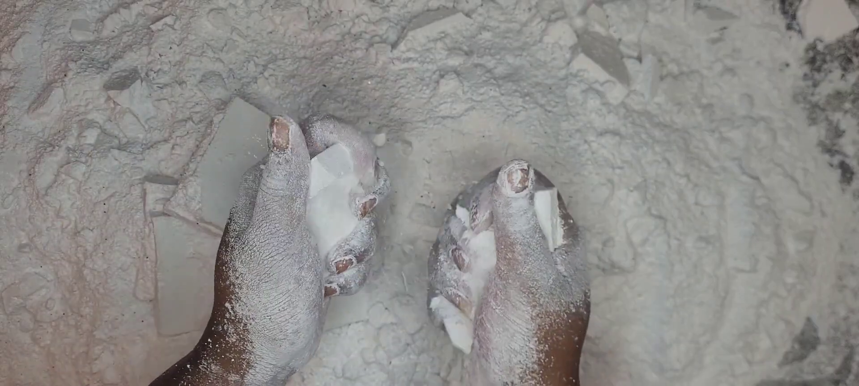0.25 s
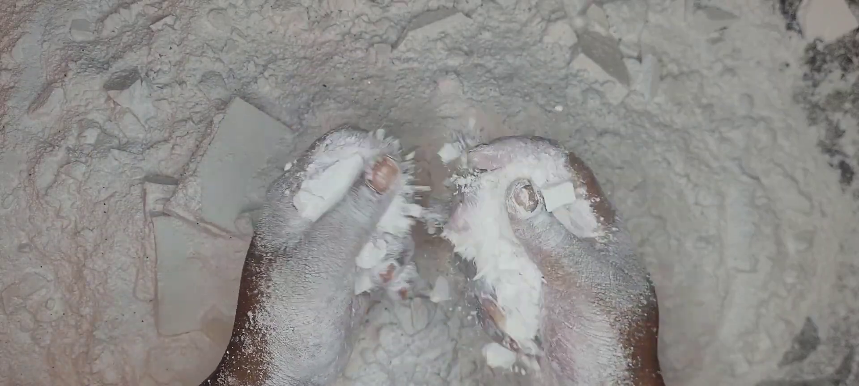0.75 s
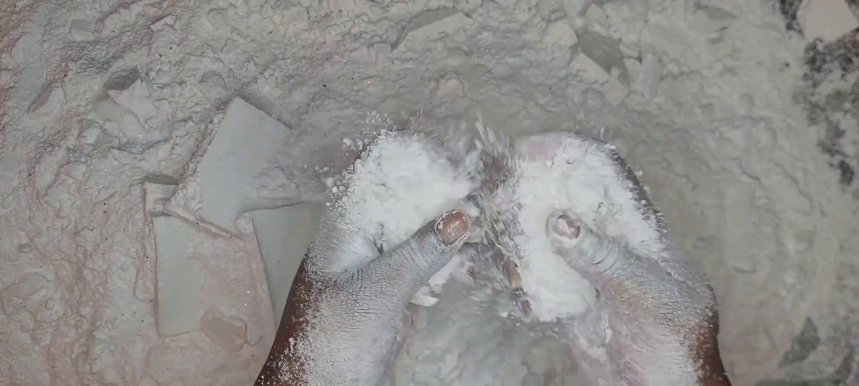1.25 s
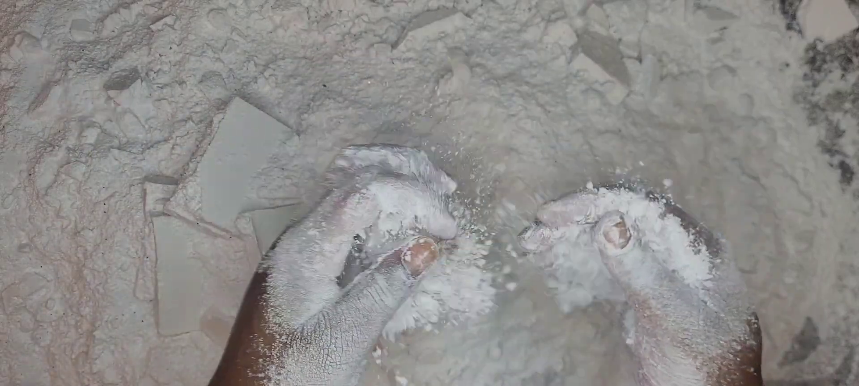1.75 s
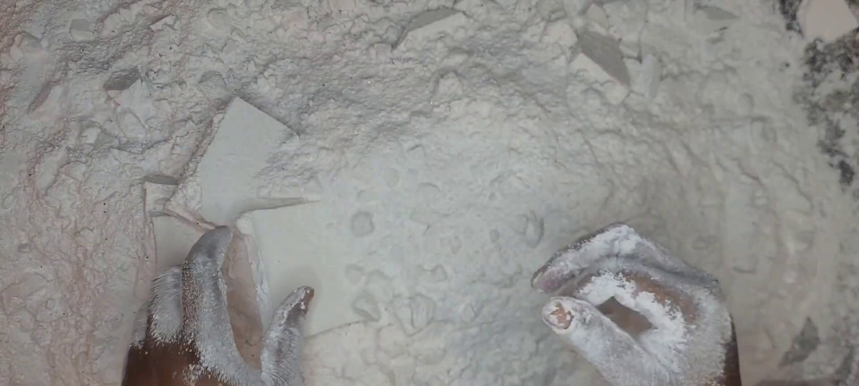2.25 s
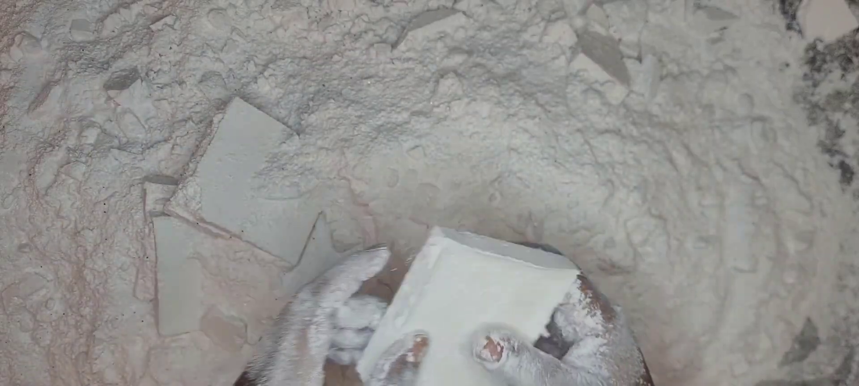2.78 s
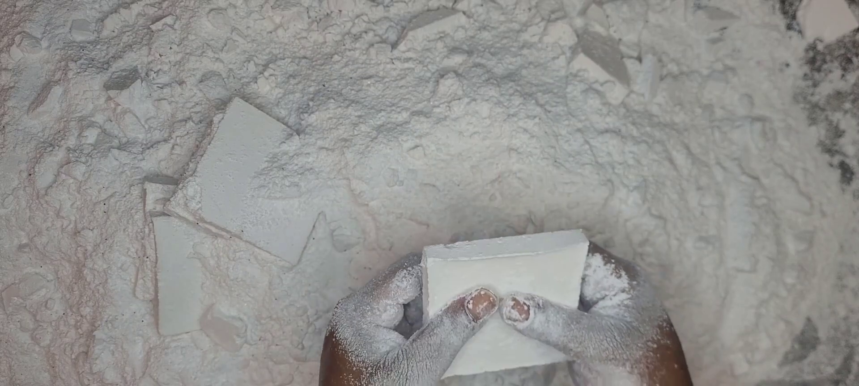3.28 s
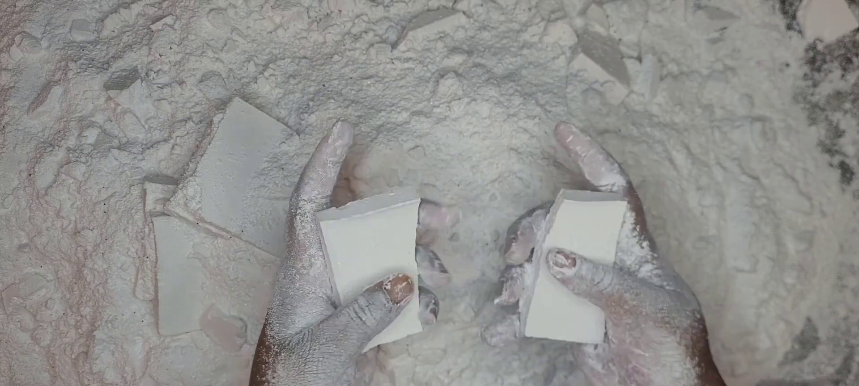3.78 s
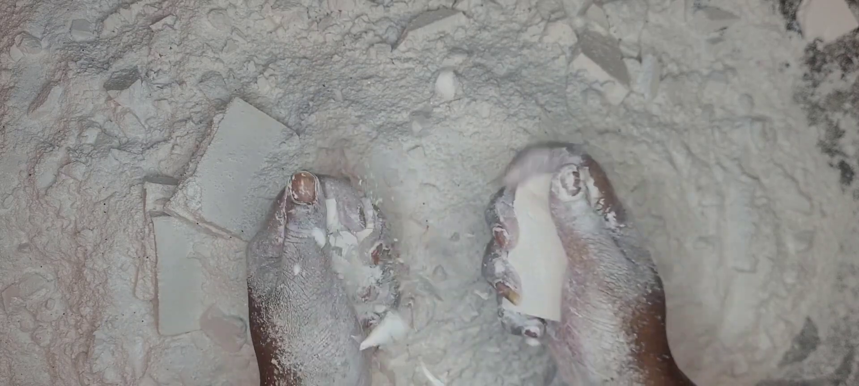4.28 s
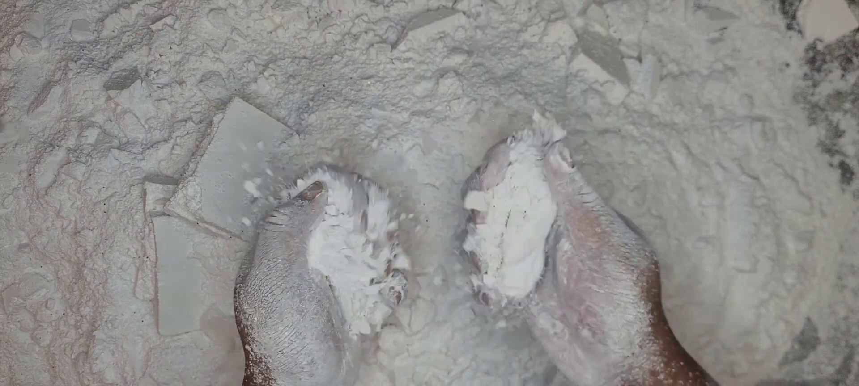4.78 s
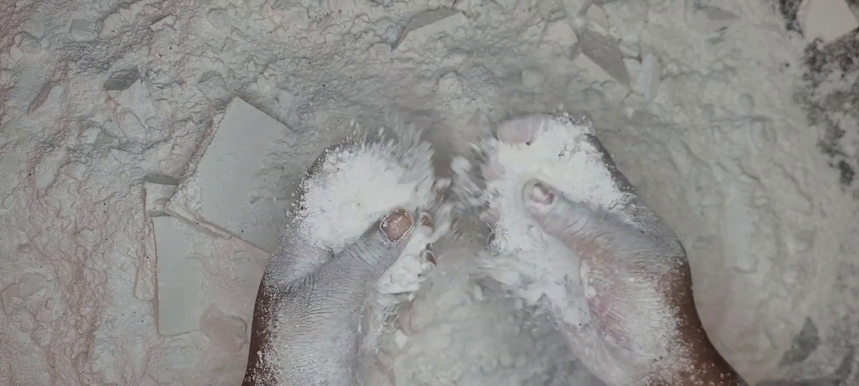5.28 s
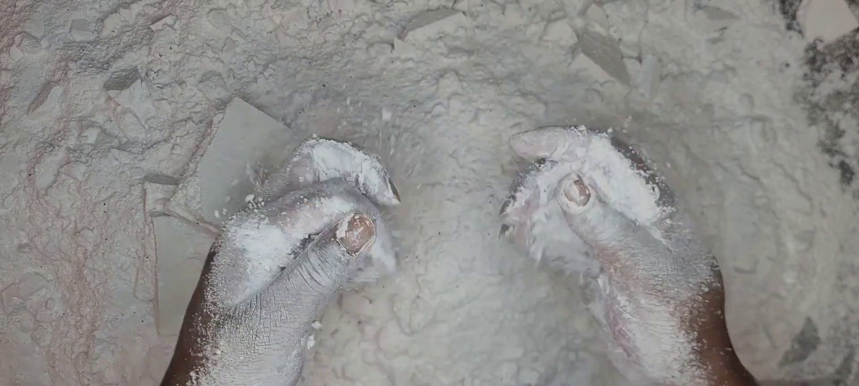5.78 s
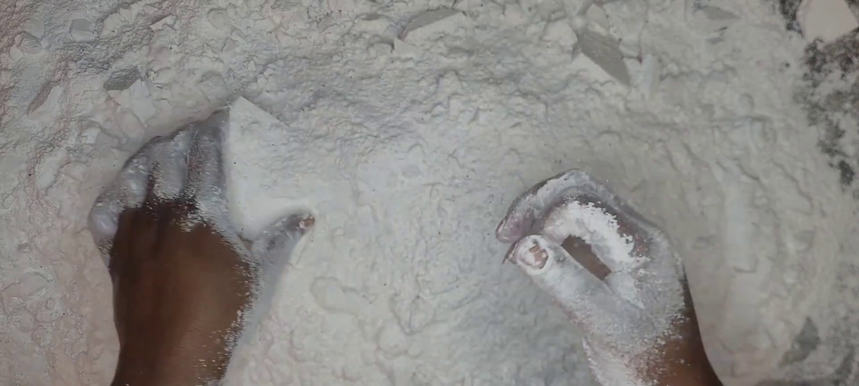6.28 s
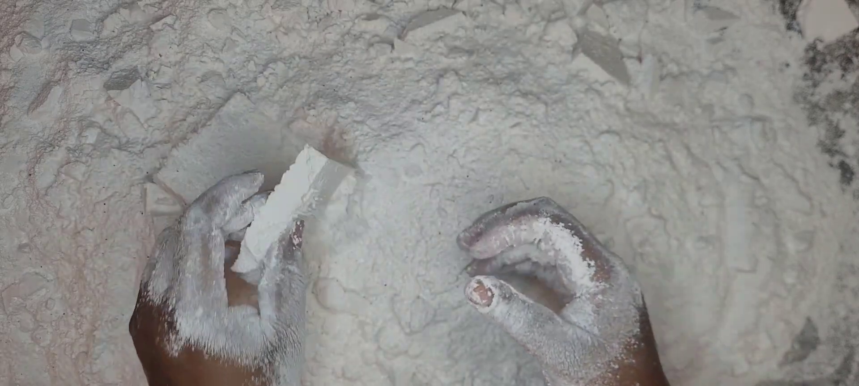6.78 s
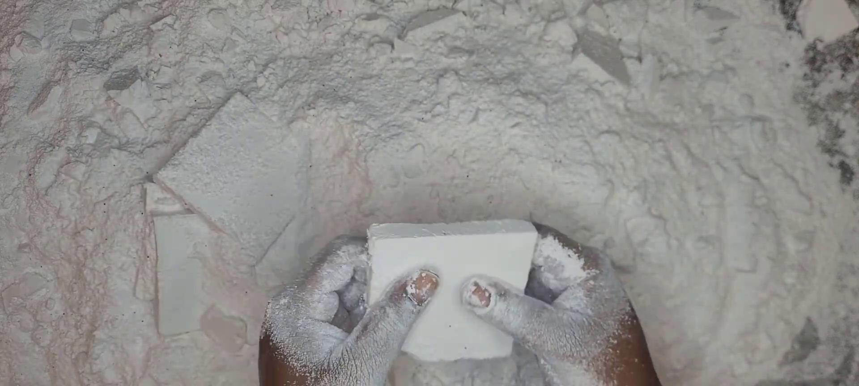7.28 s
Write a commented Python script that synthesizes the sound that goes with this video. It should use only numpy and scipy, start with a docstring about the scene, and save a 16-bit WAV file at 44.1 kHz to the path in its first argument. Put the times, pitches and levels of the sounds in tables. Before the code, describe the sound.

Very close, two hands crush chalk over a powder heap in a small room. Brittle cracks and gritty squeezes soften into powdery crunching, with crumbs tapping down. A new block knocks, scrapes faintly and is rubbed by dry fingers, then snaps sharply. A dense burst of cracks and more grinding follow, then scraping of another block and a final snap. A low beating hum runs throughout.

```python
"""Two hands crush blocks of chalk, up close, over a heap of powder in a small room.
Fists crack lumps with bursts of tiny clicks and grind them to powder with filtered, crackling grains.
A block is dragged, rubbed and snapped: friction grains drive its resonances, and struck modes ring.
Lumps tap on the heap, dust hisses, skin squeaks; beating motors, a drone and rumble hum low behind."""
import sys
import numpy as np
from scipy import signal
from scipy.fft import rfft, irfft, next_fast_len
from scipy.io import wavfile
from scipy.ndimage import map_coordinates

SR = 44100
rng = np.random.default_rng(int(sys.argv[2]) if len(sys.argv) > 2 else 0)


def unload_wav(signal):
    """Save mono or channel-first audio to the path in sys.argv[1] as 16-bit WAV at rate SR, clipped to [-1, 1]."""
    wavfile.write(
        sys.argv[1],
        SR,
        np.round(np.clip(np.atleast_2d(signal).T, -1, 1) * 32767).astype(np.int16),
    )


N = 332514
TIME = np.arange(N) / SR


def from_db(db):
    """Amplitude gain of a level in dB."""
    return 10 ** (np.asarray(db) / 20)


def rms_one(x):
    """Scale a signal to rms 1."""
    return x / np.sqrt(np.mean(x ** 2) + 1e-20)


def drift(rate_hz):
    """Slow random wander of rms 1: noise through two equal low-pass poles."""
    step = 20  # samples between the points of the slow curve
    pole = np.exp(-2 * np.pi * step * rate_hz / SR)
    warm_up = 4000
    noise = rng.standard_normal(N // step + warm_up + 2)
    slow = signal.lfilter([1], [1, -2 * pole, pole * pole], noise)[warm_up:]
    return np.interp(np.arange(N) / step, np.arange(len(slow)), rms_one(slow))


def colour(x, points):
    """Causal (minimum-phase) filter that follows a list of (Hz, dB)."""
    size = 2 * next_fast_len(len(x))
    hz, db = np.transpose(points)
    log_hz = np.log(np.maximum(np.arange(size // 2 + 1) * SR / size, 1))
    gain = from_db(np.interp(log_hz, np.log(hz), db))
    # folding the cepstrum onto positive times makes the filter causal
    cepstrum = irfft(np.log(gain))
    cepstrum[1:size // 2] *= 2
    cepstrum[size // 2 + 1:] = 0
    response = np.exp(rfft(cepstrum))
    return irfft(rfft(x, size) * response)[:len(x)]


def band(x, hz, kind):
    """Second-order Butterworth filter."""
    return signal.sosfilt(signal.butter(2, hz, kind, fs=SR, output="sos"), x)


def resonate(x, hz, width_hz):
    """Two-pole resonance with gain 1 on top."""
    r = np.exp(-np.pi * width_hz / SR)
    feed = np.array([1, 0, -1]) * (1 - r * r) / 2
    feedback = [1, -2 * r * np.cos(2 * np.pi * hz / SR), r * r]
    return signal.lfilter(feed, feedback, x + 1e-18)


def body(x, modes):
    """Resonances side by side, with alternating signs."""
    return sum((-1) ** k * from_db(db) * resonate(x, hz, width) for k, (hz, width, db) in enumerate(modes))


def regrip(x):
    """As the grip changes, a slightly uneven reading speed makes the resonances of a held block wander."""
    speed = 1 + 0.015 * drift(5)
    return map_coordinates(x, [np.cumsum(speed)], order=3, mode="mirror")


def ring(hz, t60):
    """A struck mode: a sine in a decay from height 1 that loses 60 dB in t60 seconds."""
    t = TIME[:SR // 4]
    return np.sin(2 * np.pi * hz * t) * np.exp(-np.log(1000) * t / t60)


def add(out, s, sound):
    """Mix a sound in at s seconds."""
    start = max(round(s * SR), 0)
    out[start:start + len(sound)] += sound[:max(N - start, 0)]


def grains(per_s, spread_db, size=N):
    """Random clicks of either sign: many small, a few large."""
    born = rng.random(size) < per_s / SR
    sign = rng.choice([-1, 1], size)
    return born * sign * from_db(spread_db * np.minimum(rng.exponential(1, size), 4))


def fracture(ms, size=4096, debris_db=-23, debris_ms=24, snap=1.9):
    """A crack runs through the chalk as an avalanche of tiny breaks; the fragments then grate past each other."""
    age_ms = TIME[:size] * 1000
    # short cracks start at full strength, long ones build up
    swell = 1 - np.clip(ms / 4 - 1.2, 0, 0.85) * np.exp(-3 * age_ms / ms)
    burst = grains(per_s=20000, spread_db=2.5, size=size)
    burst[0] += snap
    burst = burst * swell * np.exp(-(age_ms / ms) ** 1.25)
    # a longer crack carries more energy and leaves more debris
    burst = burst * np.sqrt(np.sum(age_ms < ms) / np.sum(burst ** 2))
    debris = rms_one(grains(per_s=2500, spread_db=0.0, size=size)) * np.exp(-age_ms / debris_ms)
    return burst + from_db(debris_db) * np.sqrt(ms / 0.93) * debris


def strokes(rows, attack_s, build_db, release_s):
    """Gain over time of hand strokes: each sets in, builds as the pressure grows, then dies away."""
    power = np.zeros(N)
    for s, length, db in rows:
        age = TIME - s
        attack = np.clip(age / attack_s, 0, 1)
        build = from_db(db + build_db * (np.clip(age / length, 0, 1) - 1))
        release = np.exp(-np.maximum(age - length, 0) / release_s)
        power += (attack * build * release) ** 2
    return np.sqrt(power)


def tone(hz, wander_hz):
    """A sine of rms 1 whose pitch wanders."""
    return np.sqrt(2) * np.sin(2 * np.pi * np.cumsum(hz + wander_hz * drift(3.1)) / SR)


# Room rumble and hiss. Each row: frequency in Hz, relative density in dB per Hz.
RUMBLE_SPECTRUM = [(25, -9.5), (40, -5), (75, 3), (110, 9), (140, -0.5), (220, -7.5), (350, -8),
                   (550, -14.5), (1000, -25.5), (2600, -30), (5000, -33), (10000, -37), (16000, -42)]
RUMBLE_DB = -34.5


def rumble():
    """Steady noise, strongest in the bass, with a faint hiss on top."""
    noise = band(rng.standard_normal(N), 35, "high")
    return from_db(RUMBLE_DB) * rms_one(colour(noise, RUMBLE_SPECTRUM))


# Motors at nearly the same speed. Each row: frequency in Hz, level in dB relative to MOTORS_DB.
MOTOR_TONES = [(56.63, 0), (58.0, -8), (58.53, -6.5), (58.88, -7.5), (59.24, -5)]
MOTORS_DB = -36.0
IN_STEP_S = 4.15  # the moment at which they all swell together


def motors():
    """Steady tones close in pitch beat against each other."""
    mix = sum(from_db(MOTORS_DB + db) * np.cos(2 * np.pi * hz * (TIME - IN_STEP_S)) for hz, db in MOTOR_TONES)
    return np.sqrt(2) * mix


DRONE_HZ, DRONE_DB, DRONE_THROB_DB, DRONE_FLUTTER_DB = 97.3, -37.5, 2, 2.5
THROB_PER_S, THROB_PEAK_S = 1.93, 2.95


def drone():
    """A higher tone that throbs regularly and flutters at random."""
    throb = np.cos(2 * np.pi * THROB_PER_S * (TIME - THROB_PEAK_S))
    level_db = DRONE_DB + DRONE_THROB_DB * throb + DRONE_FLUTTER_DB * drift(10)
    return from_db(level_db) * tone(DRONE_HZ, wander_hz=1.59)


# Fainter tones of the hum. Each row: centre frequency in Hz, middle level in dB.
FAINT_TONES = [(41.5, -50), (117, -47), (120.1, -41.5), (174, -54), (238, -59), (303, -54.5)]


def faint_tones():
    """Tones that waver a little in level and pitch."""
    return sum(from_db(db + 2.44 * drift(5.0)) * tone(hz, wander_hz=0.00481 * hz) for hz, db in FAINT_TONES)


def hum():
    """Beating motors, a throbbing drone and fainter tones over a steady rumble."""
    return motors() + drone() + faint_tones() + rumble()


# Tint of the room echo. Each row: frequency in Hz, gain in dB.
ECHO_TINT = [(150, -0.5), (600, -0.5), (1500, 1), (3000, 0.5), (7000, -3), (15000, 0)]


def room(x, t60=0.33, wet_db=-10, first_echo_s=0.0026):
    """Dense echoes from nearby walls: convolution with decaying, coloured noise."""
    t = TIME[:SR // 2]
    onset = np.clip(t / first_echo_s - 1, 0, 1)
    tail = rng.standard_normal(len(t)) * np.exp(-np.log(1000) * t / t60) * onset
    tail = colour(tail / np.sqrt(np.sum(tail ** 2)), ECHO_TINT)
    return from_db(wet_db) * signal.fftconvolve(x, tail)[:N]


# Skin squeaking on chalk. Each row: centre in seconds, half length in seconds, pitch at the centre in Hz,
# glide in Hz per second, peak level in dB.
SKIN_SQUEAKS = [(2.97, 0.046, 4570, -3200, -52), (3.18, 0.085, 2010, -500, -57)]


def squeaks(waver_hz=110):
    """Faint, thin sines that fall in pitch and waver fast."""
    out = np.zeros(N)
    for s, half, hz, glide, db in SKIN_SQUEAKS:
        pitch = hz + glide * np.clip(TIME - s, -2 * half, 2 * half) + waver_hz * drift(264)
        swell = from_db(db) * np.exp(-((TIME - s) / half) ** 2)
        out += swell * np.sin(2 * np.pi * np.cumsum(pitch) / SR)
    return out


# Fine dust squirting out between the fingers. Each row: peak in seconds, half length in seconds, level in dB.
DUST_PUFFS = [(1.643, 0.018, -34), (3.357, 0.025, -32), (5.693, 0.032, -41), (5.947, .022, -40)]


def puffs(low_hz=7000):
    """Short bright hisses of escaping dust."""
    swell = sum(from_db(db) * np.exp(-((TIME - s) / half) ** 2) for s, half, db in DUST_PUFFS)
    dust = grains(per_s=9000, spread_db=3)
    return swell * rms_one(band(dust, low_hz, "high"))


# Loosened lumps dropping. Each row: start in seconds, gain in dB.
LUMP_DROPS = [(0.034, -19), (0.206, -18.5), (1.1161, -16), (1.202, -18), (1.3561, -19.5), (1.4361, -17),
              (1.706, -24), (1.8332, -21.5), (1.9172, -18), (2.2287, -29.5), (2.49, -30.5), (2.68, -31),
              (4.8987, -18), (4.939, -22), (5.018, -20), (6.458, -21.5), (6.575, -20.5), (6.719, -21)]
# Spectrum of their dull tap. Each row: frequency in Hz, gain in dB.
TAP_SPECTRUM = [(60, -15), (300, -6.5), (560, 5), (850, 5.5), (1400, -3.5), (3200, -10.5), (5300, -16.5),
                (7500, -25), (10000, -37), (15500, -39)]
LUMP_MS = 4.6


def lumps():
    """Lumps land on the heap and crumble a little."""
    out = np.zeros(N)
    for s, db in LUMP_DROPS:
        add(out, s, from_db(db) * colour(fracture(LUMP_MS), TAP_SPECTRUM))
    return out


# Pulls of a block off the heap. Each row: start in seconds, length in seconds, relative level at the end in dB.
DRAG_PULLS = [(2.38, 0.12, -43), (6.4, 0.069, -36.5), (6.51, 0.052, -38.5), (6.61, 0.03, -38),
              (6.67, 0.062, -36)]
# Resonances of the scraped block. Each row: frequency in Hz, width in Hz, gain in dB.
SCRAPE_MODES = [(800, 51, 5.5), (900, 110, 0), (1270, 97, 2), (1860, 64, 3), (2330, 210, -4.5),
                (2850, 95, -1), (3400, 50, 2), (5040, 96, 5.5), (6160, 60, 2), (6930, 130, 1),
                (7330, 120, 0.5), (8700, 500, -2)]
DRAG_ATTACK_S, DRAG_BUILD_DB, DRAG_RELEASE_S = 0.016, 6.0, 0.035


def dragging(grit_db=-14, firm_db=-35, soft_hz=1900):
    """Chalk scrapes over chalk in uneven jerks; a light touch is duller than a firm one."""
    friction = grains(per_s=1500, spread_db=1.5) * from_db(5.8 * drift(65))
    grit = band(friction, 600, "high")
    scrape = rms_one(regrip(body(friction, SCRAPE_MODES)) + from_db(grit_db) * grit)
    pressure = strokes(DRAG_PULLS, DRAG_ATTACK_S, DRAG_BUILD_DB, DRAG_RELEASE_S)
    firmness = np.clip(pressure / from_db(firm_db), 0, 1)
    dull, bright = band(scrape, soft_hz, "low"), band(scrape, soft_hz, "high")
    return from_db(5.0) * pressure * (dull - firmness * bright)


# Fingers sliding on a block. Each row: start in seconds, length in seconds, relative level at the end in dB.
FINGER_RUBS = [(2.75, 0.054, -48), (2.85, 0.053, -41), (3.02, 0.054, -43.5), (3.07, 0.066, -47),
               (3.48, 0.097, -40), (3.56, 0.12, -33.5), (3.69, 0.12, -43.5), (3.82, 0.057, -34.5),
               (3.9, 0.032, -27), (7.055, 0.052, -39.5), (7.155, 0.017, -37), (7.24, 0.094, -38)]
# Resonances of block and cupped hands. Each row: frequency in Hz, width in Hz, gain in dB.
HELD_BLOCK_MODES = [(2520, 140, -8.5), (2890, 170, -8.5), (3360, 55, 0), (3885, 77, -0.5),
                    (4540, 180, -6.5), (4760, 230, -3.5), (5850, 150, -9.5), (6680, 260, -3.5),
                    (7040, 180, -19), (7730, 450, -7), (7600, 170, 0.5), (8230, 200, -4), (9360, 140, -5.5),
                    (10750, 1100, -16.5), (14700, 1000, -11)]
RUB_ATTACK_S, RUB_BUILD_DB, RUB_RELEASE_S = 0.013, 11, 0.011


def rubbing(skin_db=-15):
    """Dry skin drags over the fine pores of a block: a gritty rustle that also sounds the block's resonances."""
    friction = grains(per_s=5400, spread_db=2.0) * from_db(0.91 * drift(95))
    ringing = band(regrip(body(friction, HELD_BLOCK_MODES)), 2100, "high")
    rustle = band(grains(per_s=6600, spread_db=0.0), [2400, 10000], "band")
    pressure = strokes(FINGER_RUBS, RUB_ATTACK_S, RUB_BUILD_DB, RUB_RELEASE_S)
    return from_db(2.65) * pressure * rms_one(ringing + from_db(skin_db) * rustle)


# A whole block is knocked or snapped. Each row: start in seconds, gain in dB.
BLOCK_KNOCKS = [(1.949, -16), (3.317, -23.5), (7.513, -26)]
# Modes of a block. Each row: frequency in Hz, relative level in dB, 60 dB decay time in seconds.
KNOCK_MODES = [(1236, -8.5, 0.14), (1436, 4.5, 0.019), (2030, -11, 0.051), (2650, 3, 0.03)]


def knocks():
    """Whole blocks ring briefly in a few struck modes."""
    out = np.zeros(N)
    block = sum(from_db(db) * ring(hz, t60) for hz, db, t60 in KNOCK_MODES)
    for s, db in BLOCK_KNOCKS:
        add(out, s, from_db(db) * block)
    return out


# A fist jolts shut as its lump gives way. Each row: start in seconds, frequency in Hz, level in dB,
# 60 dB decay time in seconds.
FIST_THUMPS = [(0.22, 130, -12.5, 0.013), (4.3318, 153, -6.5, 0.038), (4.331, 170, -31, 0.024),
               (7.511, 180, -11.5, 0.025)]


def thumps():
    """Closing fists thud: low modes that die at once."""
    out = np.zeros(N)
    for s, hz, db, t60 in FIST_THUMPS:
        add(out, s, from_db(db) * ring(hz, t60))
    return out


# Chalk fractures. Each row: start in seconds, length in ms, gain in dB, brightness in dB per octave,
# resonance of the piece in the hand in Hz.
CHALK_CRACKS = [(0.0494, 1.8, -12, -2.5, 505), (0.055, 7.9, -15.5, 0.2, 3500), (0.083, 5.5, -20, -2.7, 600),
                (0.0877, 6.6, -10, -0.2, 1690), (0.237, 4.4, -17, -1.5, 450), (0.241, 5.4, -12.5, 3, 585),
                (0.265, 1, -16.5, 0, 710), (0.393, 3.7, -25, 2.5, 800), (0.4208, 5.9, -25, 2, 1200),
                (0.425, 4.8, -13, -1.6, 2950), (0.44, 6.3, -20.5, 3, 3200), (0.493, 7, -24, 1, 1500),
                (0.6, 4.4, -24, 0.8, 2220), (0.8452, 4.6, -28, 1, 3500), (0.9321, 2.9, -25.5, -1, 3020),
                (1.2156, 4.4, -26, 5, 3000), (1.2803, 1.8, -22.5, 0.5, 1420),
                (1.581, 0.53, -13.5, 9.5, 12800), (1.662, 5.2, -29.5, 5, 2980),
                (1.95, 4, -12.5, -1.4, 1510), (2.282, 2.3, -40, 2, 4000), (3.317, 3.7, -8, 4, 1300),
                (4.1, 4.6, -26.5, 5.5, 3000), (4.115, 4.1, -14, 0.3, 2480), (4.163, 6.8, -12.5, 1.3, 750),
                (4.1918, 4.6, -14.5, 1.5, 750), (4.2, 8.7, -18, 4.5, 3040), (4.21, 5.5, -11, 1.1, 1770),
                (4.297, 6.9, -15, 2, 700), (4.32, 7.4, -24, 0.5, 3000), (4.33, 5.8, -7.5, 0.4, 910),
                (4.406, 4.8, -27.5, -1, 7500), (4.471, 6.8, -23.5, -5.5, 1210),
                (4.476, 7.6, -16.5, -1, 2500), (4.51, 13, -27, 1.5, 2650), (4.731, 1.9, -16, 2.5, 750),
                (5.3703, 3.8, -33, -2, 2200), (5.9148, 2.5, -19, 10.5, 6400), (6.045, 7.2, -27.5, -2, 1000),
                (6.0755, 5.7, -27.5, 5.5, 4100), (6.1139, 7.4, -31, 0.7, 2500), (7.5098, 6, -13, 3.5, 1000)]
# Spectrum of a fracture of middling brightness. Each row: frequency in Hz, gain in dB.
CRACK_SPECTRUM = [(60, -15.5), (300, 4), (560, 2), (850, 4.5), (1400, 1), (3200, 1), (5300, -2.5),
                  (7500, -2.5), (10000, -12.5), (15500, -17.5)]
# brightness tilts that spectrum about a pivot, between two edges
TILT_LOW_HZ, TILT_PIVOT_HZ, TILT_HIGH_HZ = 740, 3150, 11200
PIECE_DB, PIECE_Q = 1.5, 2.9  # strength and sharpness of the piece's resonance


def cracks():
    """Fractures are dull inside a closed fist and bright at an open edge; each piece adds its own brief resonance."""
    out = np.zeros(N)
    hz, middling_db = np.transpose(CRACK_SPECTRUM)
    octaves = np.log2(np.clip(hz, TILT_LOW_HZ, TILT_HIGH_HZ) / TILT_PIVOT_HZ)
    for s, ms, db, brightness, piece_hz in CHALK_CRACKS:
        spectrum = np.column_stack([hz, middling_db + brightness * octaves])
        crack = colour(fracture(ms), spectrum)
        piece = resonate(crack, piece_hz, piece_hz / PIECE_Q)
        add(out, s, from_db(db) * (crack + from_db(PIECE_DB) * piece))
    return out


def crumbs(per_s, spread_db, cycles, count=14):
    """Small pieces break at random, each ringing for a few cycles at a pitch set by its size."""
    pitches = np.geomspace(700, 8000, count)
    sizes = [resonate(grains(per_s / count, spread_db), hz, hz / cycles) / np.sqrt(hz) for hz in pitches]
    return rms_one(sum(sizes))


# A fist clenches and grinds the chalk down. Each row: start in seconds, length in seconds,
# relative level at the end in dB, extra gain of the coarse grit in dB.
FIST_SQUEEZES = [(-0.02, 0.092, -37.5, 0), (0.185, 0.14, -44, 4), (0.4, 0.16, -44, -17),
                 (0.6, 0.09, -48, 1), (0.684, 0.048, -36.5, 0), (0.826, 0.21, -38, -2.5),
                 (1.103, 0.19, -42.5, -0.5), (1.326, 0.13, -38, -0.5), (1.596, 0.14, -42.5, -1),
                 (1.817, 0.075, -37, -2), (4.047, 0.42, -43.5, -3.5), (4.405, 0.088, -48, -10),
                 (4.61, 0.19, -41, -4), (4.85, 0.18, -39.5, -2.5), (5.096, 0.15, -43, -1.5),
                 (5.346, 0.28, -40.5, -2), (5.664, 0.023, -37.5, -5), (5.79, 0.068, -41, -1),
                 (5.96, 0.17, -41, -3), (6.213, 0.041, -49.5, 3)]
# Spectrum of the grinding. Each row: frequency in Hz, relative density in dB per Hz.
POWDER_SPECTRUM = [(250, 7), (450, 0), (850, 10.5), (1100, 5.5), (2000, 3.5), (3500, 2.5), (5200, 0.5),
                   (7800, 2), (10000, -7), (15500, -9.5)]
SQUEEZE_ATTACK_S, SQUEEZE_BUILD_DB, SQUEEZE_RELEASE_S = 0.023, 1.5, 0.11


def crunch(split_hz=2800, slip_db=2.5):
    """Packed powder yields in small slips; grit crackles and the finest dust hisses."""
    clench = SQUEEZE_ATTACK_S, SQUEEZE_BUILD_DB, SQUEEZE_RELEASE_S
    dust_gain = strokes([(s, length, db) for s, length, db, _ in FIST_SQUEEZES], *clench)
    grit_gain = strokes([(s, length, db + coarse) for s, length, db, coarse in FIST_SQUEEZES], *clench)
    slips = from_db(slip_db * drift(58))
    coarse_grains = colour(grains(per_s=1000, spread_db=3.0) * slips, POWDER_SPECTRUM)
    fine_grains = colour(grains(per_s=5500, spread_db=2.0) * slips, POWDER_SPECTRUM)
    grit = rms_one(band(coarse_grains, [300, split_hz], "band"))
    dust = rms_one(band(fine_grains, split_hz, "high"))
    pieces = crumbs(per_s=170, spread_db=5.0, cycles=3.0)
    return grit_gain * (from_db(-1.5) * grit + from_db(-9.0) * pieces) + dust_gain * dust


def scene():
    """The hands at work, their echo and the hum."""
    handling = squeaks() + puffs() + lumps() + dragging() + rubbing()
    crushing = knocks() + thumps() + cracks() + crunch()
    chalk = handling + crushing
    return (chalk + room(chalk) + hum())[None]


CUTOFF_HZ = 15900


def record(dry):
    """The deepest bass is rolled off, the highest peaks are rounded and the top is cut."""
    thinned = band(dry, 30, "high")
    rounded = thinned / (1 + thinned ** 4) ** 0.25
    return signal.sosfilt(signal.ellip(10, 0.1, 80, CUTOFF_HZ, fs=SR, output="sos"), rounded)


dry = scene()
out = record(dry)
unload_wav(out)
```